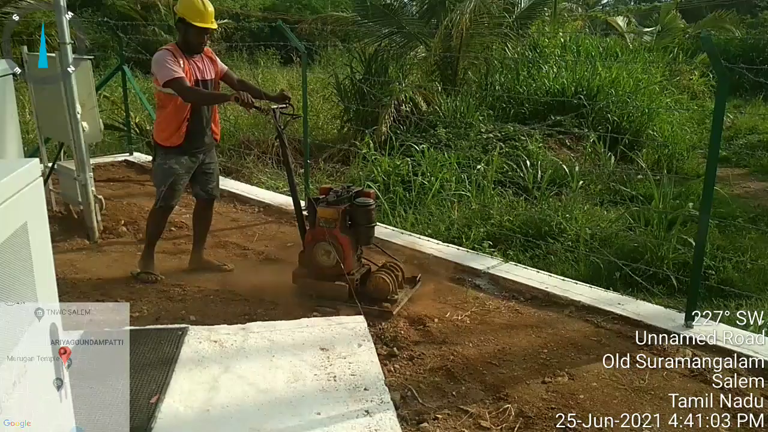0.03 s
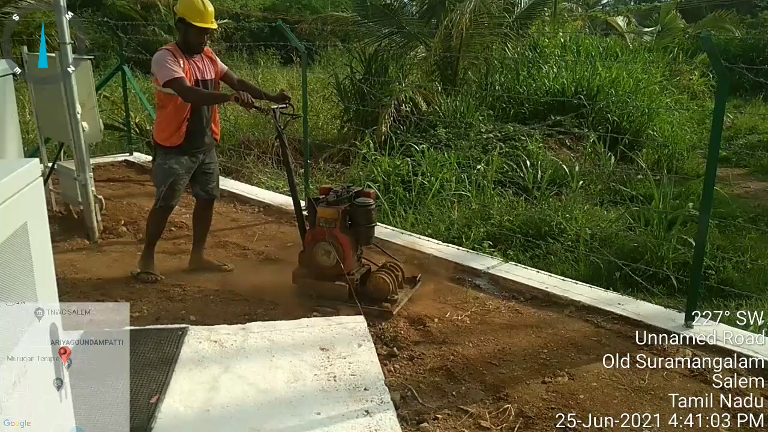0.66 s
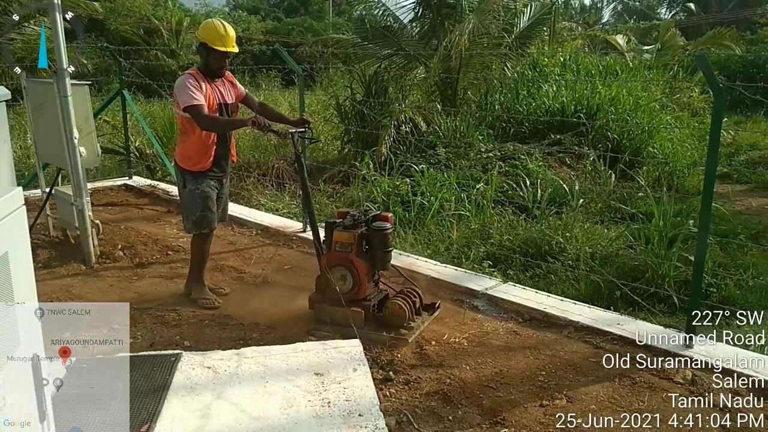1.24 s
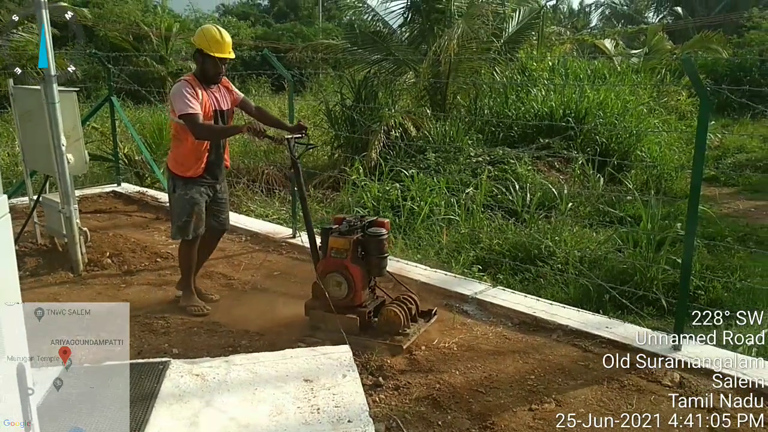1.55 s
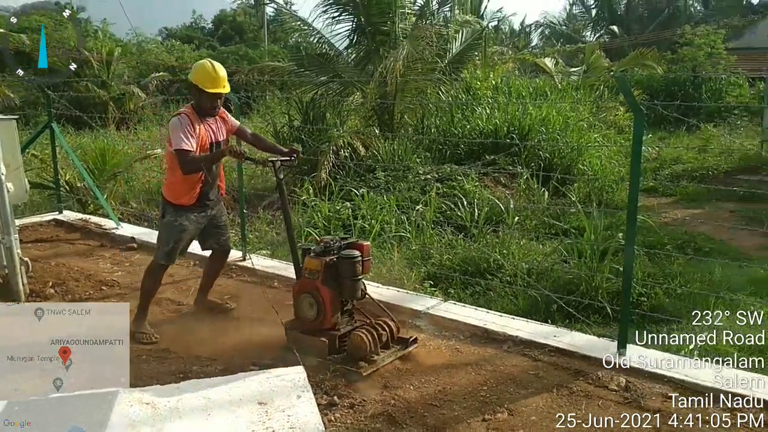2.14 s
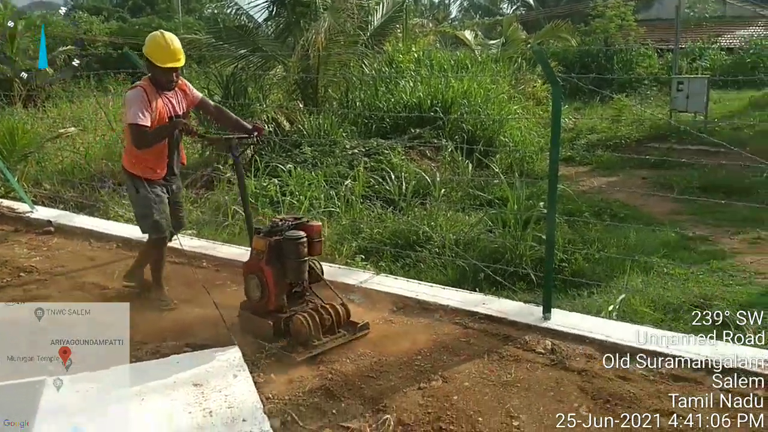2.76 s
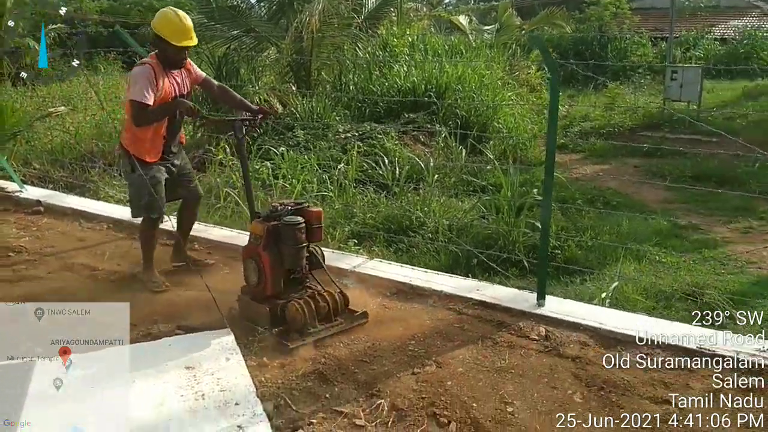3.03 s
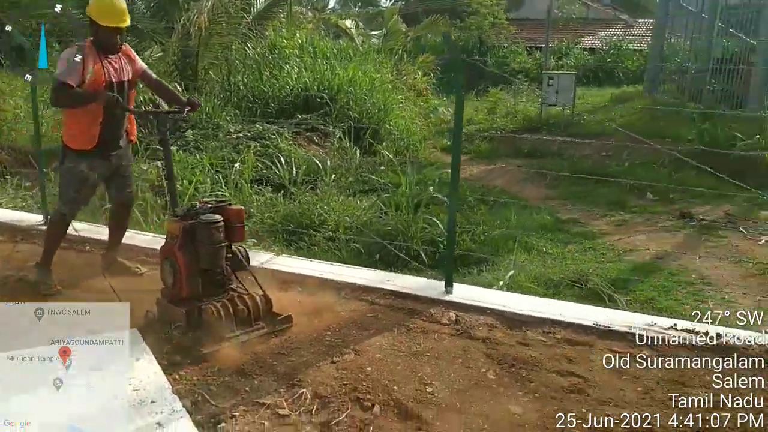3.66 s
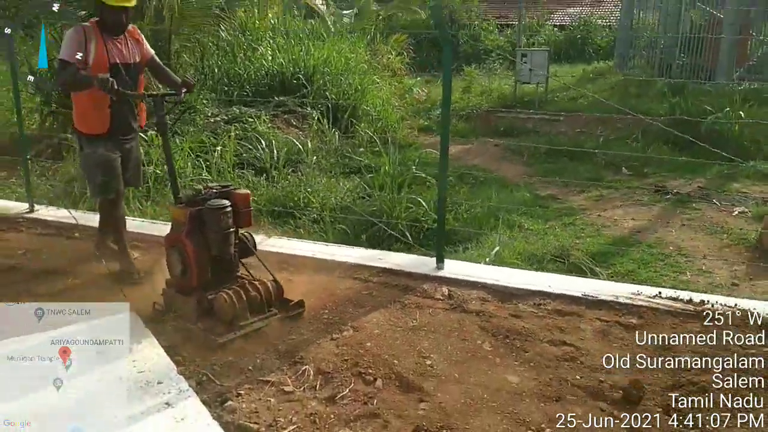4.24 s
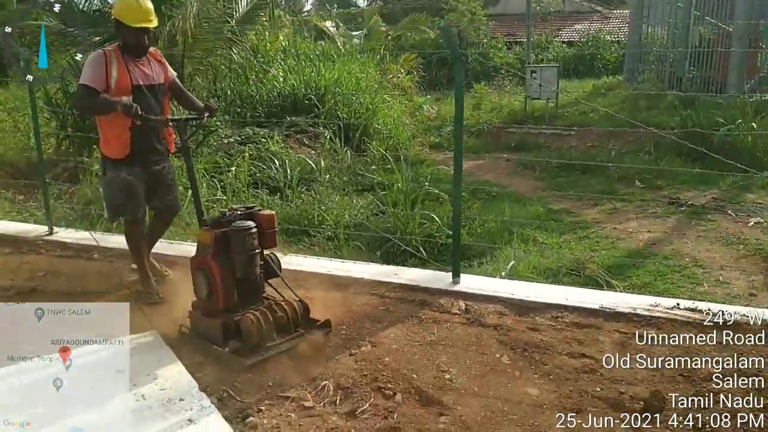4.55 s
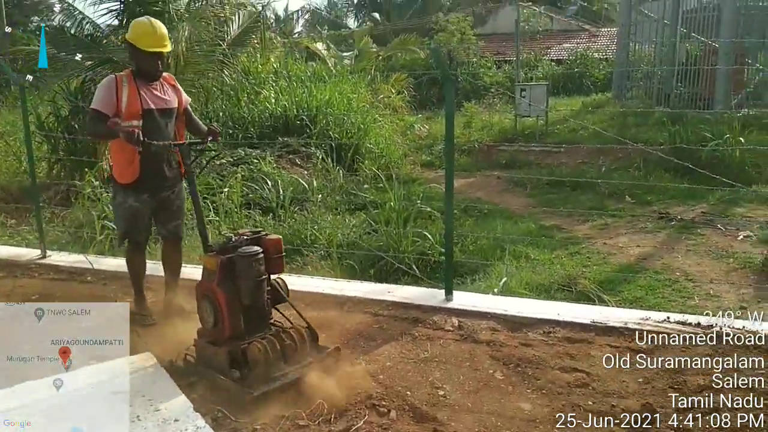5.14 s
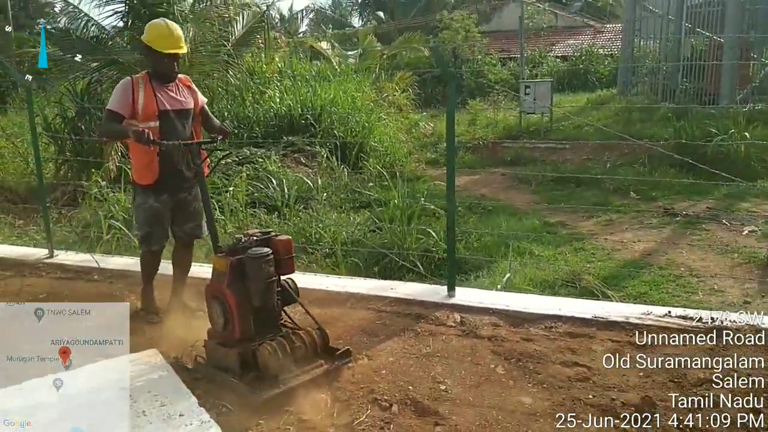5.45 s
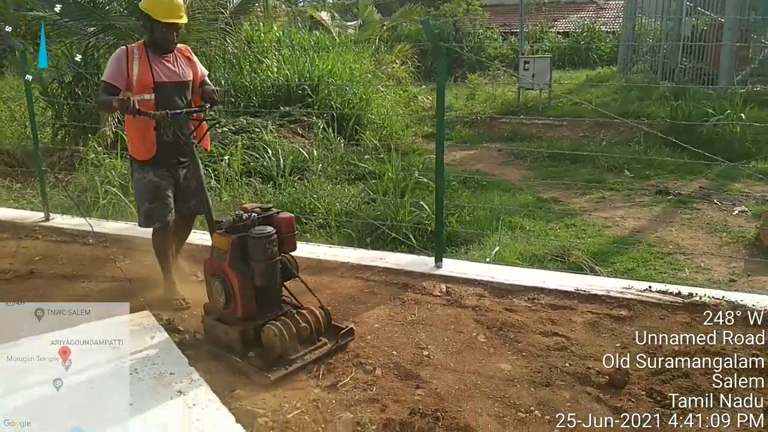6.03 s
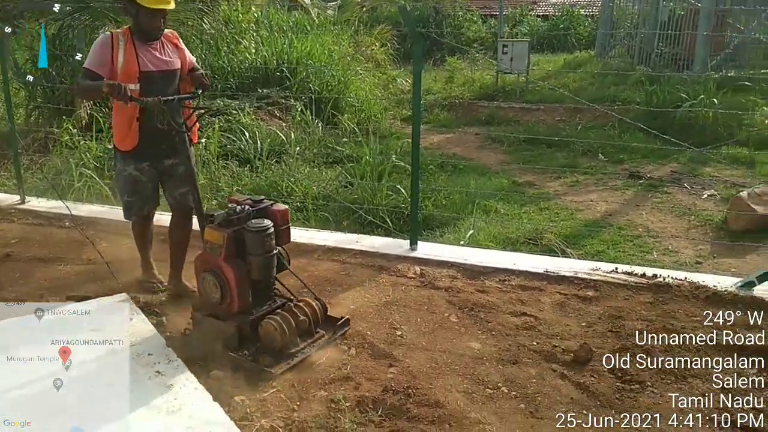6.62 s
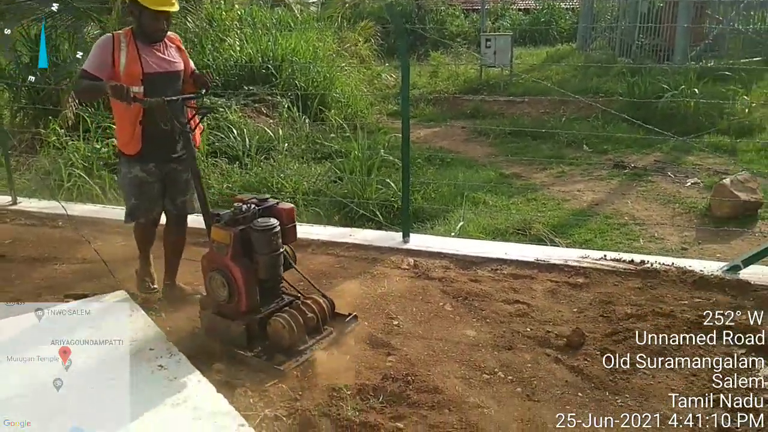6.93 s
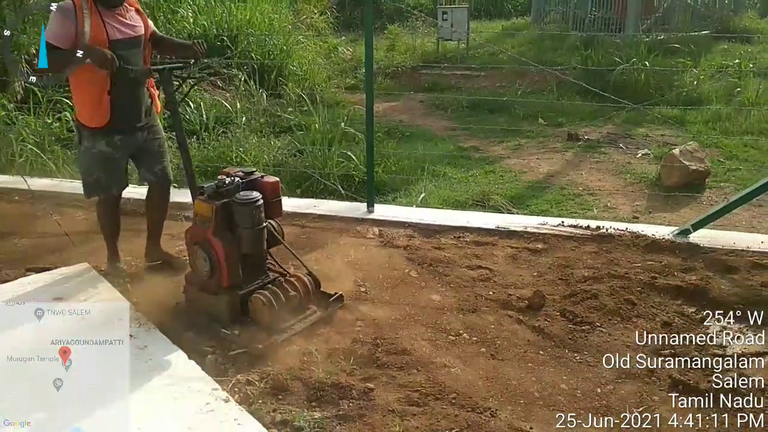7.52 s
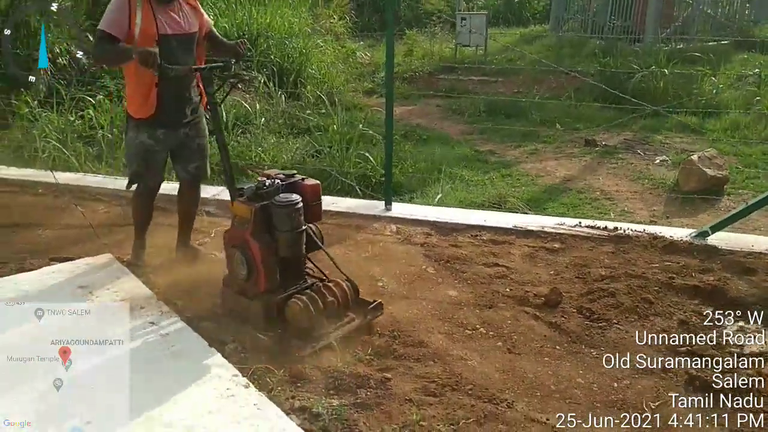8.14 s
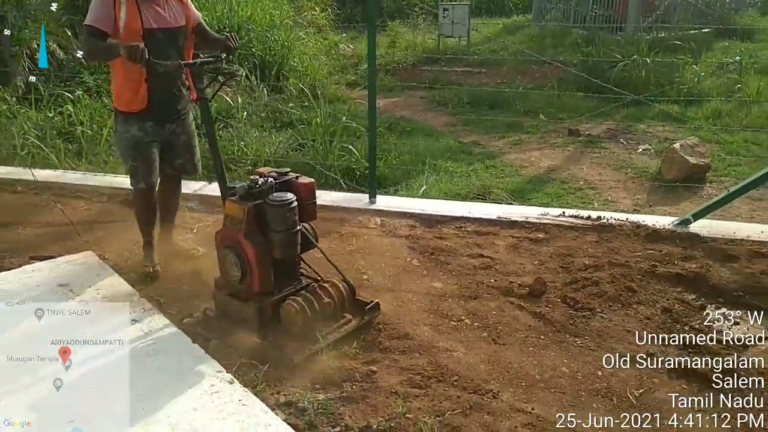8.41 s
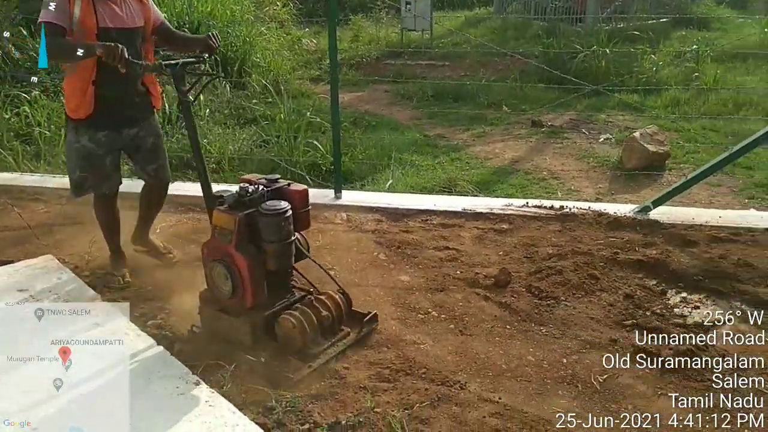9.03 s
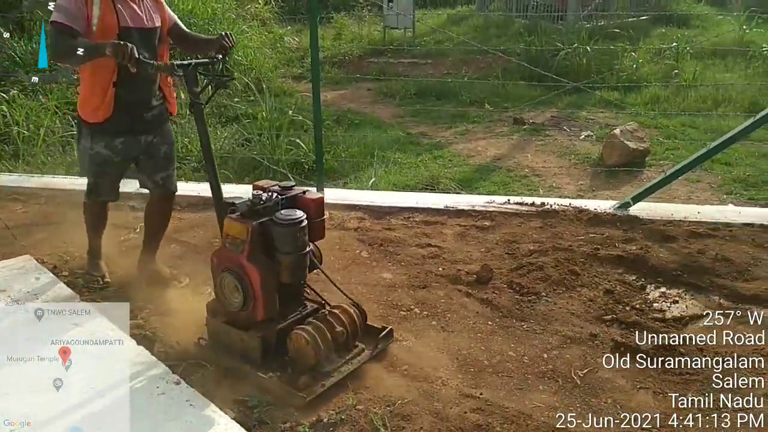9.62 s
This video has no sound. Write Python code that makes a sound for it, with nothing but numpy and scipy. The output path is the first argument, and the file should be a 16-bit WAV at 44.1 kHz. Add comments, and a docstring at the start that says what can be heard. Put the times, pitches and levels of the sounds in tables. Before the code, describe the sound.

A petrol plate compactor runs outdoors with a loud, steady low drone, rapid engine thudding and metallic rattling on bare soil.

```python
"""Plate compactor on bare soil.

A petrol four-stroke single thuds, knocks and ticks, outdoors, a few metres from a hand-held phone.
A belt spins the eccentric at 4/3 crank speed: the plate drones, beats against the engine, rattles
and grinds grit. The machine turns from side-on to head-on, so its panels ring out in turn.
The sound is on for a blip, off for almost a second, then runs on."""
import sys
import numpy as np
from scipy import signal
from scipy.fft import rfft, irfft, next_fast_len
from scipy.io import wavfile
from scipy.ndimage import uniform_filter1d

SR = 44100
rng = np.random.default_rng(int(sys.argv[2]) if len(sys.argv) > 2 else 0)


def generate_wav(signal):
    """Clip the signal to [-1, 1] and save it as 16-bit WAV at the path in sys.argv[1]."""
    frames = np.transpose(np.atleast_2d(signal))
    scaled = np.clip(frames, -1, 1) * 32767
    pcm = np.round(scaled).astype(np.int16)
    wavfile.write(sys.argv[1], SR, pcm)


N = 435266
TIME_S = np.arange(N) / SR
FIRING_HZ = 32.005
EXHAUST_AT_CYCLE, MUFFLER_ORDER = .87, 8  # order: multiple of the firing rate
# guard, tank and plate panel modes: f/Hz, width/Hz, level/dB, beam direction/deg
PANELS = [(400, 60, -7.5, 107), (511, 55, -16.5, 28), (570, 40, -17, 63), (704, 50, -12, 92),
          (1010, 110, -10, 32), (1278, 30, -3, 85), (1637, 40, -4.5, 57), (2180, 350, -8.5, 3)]


def plate(spin, drone_db, octave_db, corner_deg=65, corner_dip_db=-9.5):
    """The eccentric shakes the plate: a low drone of four harmonics."""
    harmonics_db = [
        drone_db + .5 - .3 * wander(25),
        octave_db - .5 + wander(30),
        -27 + muffler_db() + 2 * wander(30),  # rings the muffler
        -28.5 + corner_dip_db * beam(corner_deg) + 2 * wander(23)]  # cancels as a corner faces the phone
    out = 0
    for k, level_db in enumerate(harmonics_db, 1):
        lag_rad = np.pi / 2 if k % 2 == 0 else 0  # even harmonics lag a quarter cycle, softening peaks
        out = out + undb(level_db) * np.cos(2 * np.pi * k * spin - lag_rad)
    return np.sqrt(2) * out


def exhaust(cycle, surge, waver_db=1.8, smear_rad=.021, surge_db=2):
    """One thud per firing; the muffler rings at one order, smears the rest and rocks with the frame."""
    # exhaust and crank lines: order, level/dB
    lines = [(1, -36.5), (2, -21), (3, -30), (4, -32), (5, -29.5), (6, -28.5), (7, -37.5), (8, -26.5),
             (9, -29), (10, -28), (11, -59.5), (12, -34), (13, -52)]
    out = 0
    for k, level_db in lines:
        phase = 2 * np.pi * k * (cycle - EXHAUST_AT_CYCLE) + smear_rad * (k - MUFFLER_ORDER) ** 2
        rocking_db = surge_db * surge * min(k / MUFFLER_ORDER, 1)
        ring_db = muffler_db() if k == MUFFLER_ORDER else 0
        out = out + undb(level_db + ring_db + rocking_db + waver_db * wander(5)) * np.cos(phase)
    return np.sqrt(2) * out


def knock(cycle, at_cycle=.2103, scatter_rad=.64, drift_rad=.38, waver_db=.9, skew_rad=.000076):
    """Combustion rings the block; lines drift as it creeps on, high ones differ in phase at each mic."""
    # block ring lines: order, level/dB
    lines = [(15, -43.5), (16, -42), (17, -50), (18, -38), (19, -33), (20, -37.5), (21, -37.5), (22, -37),
             (23, -33.5), (24, -37), (26, -35), (27, -39), (28, -42), (31, -40), (40, -39.5), (43, -49),
             (49, -37.5), (51, -38.5), (60, -47), (61, -51)]
    out = 0
    for k, level_db in lines:
        phase = 2 * np.pi * k * (cycle - at_cycle) + scatter_rad * rng.standard_normal()
        phase += drift_rad * wander(.95)
        skew = skew_rad * k ** 2 * (1 + wander(.59) / 2) * np.array([[-1], [1]])
        out = out + undb(level_db + panel_lift_db(k) + waver_db * wander(1.3)) * np.cos(phase + skew)
    blow_db = uniform_filter1d(per_cycle(cycle), size=100)
    return np.sqrt(2) * undb(blow_db) * out


def rattle(spin, hardness_db, decay_turns=.31, floor=1.9, scatter_db=2, grain_db=3, split_hz=900):
    """Each landing jolts the loose frame, guard and handle; hard ground rings the panels more."""
    # frame response: f/Hz, level/dB
    frame = [(20, -41), (50, -7), (100, 4), (140, -1), (230, 4.5), (340, -0.5), (440, -5.5), (680, -1),
             (900, -8), (1350, -6), (2000, -12.5), (2400, -20), (3000, -27.5), (6000, -45.5)]
    jolt = floor + np.exp(-(spin % 1) / decay_turns) * undb(scatter_db * per_cycle(spin))
    blows = rng.standard_normal((2, N)) * jolt * undb(grain_db * np.tanh(wander(220)))
    mid, side = colour(blows, frame)
    side = highpass(side, split_hz, order=2) + undb(-4.5) * side  # highs spread wider
    stereo = mid + undb(-1.5) * side * np.array([[1], [-1]])
    return undb(1) * stereo + undb(-3 + .3 * hardness_db) * rings(blows, PANELS)


def clatter(cycle, jitter_cycles=.00033, blow_db=1.05, swell_db=2, views=4):
    """Piston, cam and gears repeat a run of small blows each cycle, heard from a slowly changing angle."""
    # casing response: f/Hz, level/dB
    casing = [(780, -44), (930, -5), (1100, -0.5), (1350, -2), (1480, -4), (1850, -6), (2300, -7.5),
              (2700, -23.5), (4000, -24), (8000, -61)]
    # cover resonances: f/Hz, width/Hz, lift/dB
    covers = [(1217, 90, 5), (1673, 48, 7), (1977, 70, 4)]
    position = (cycle + jitter_cycles * wander(90)) % 1
    places = np.arange(512) / 512
    swell = undb(swell_db * np.cos(4 * np.pi * (places - .21)))
    out = np.zeros((2, N))
    for view in range(views):
        fade = np.clip(1 - np.abs(TIME_S / TIME_S[-1] * (views - 1) - view), 0, 1)
        for channel in range(2):
            blows = rng.standard_normal(len(places)) * swell
            out[channel] += np.sqrt(fade) * np.interp(position, places, blows)
    return undb(-3) * colour(out * undb(blow_db * wander(100)), casing, covers)


def valves(cycle, scatter_db=1.2):
    """Valves open and seat: four bright ticks a cycle ring the valve gear, coloured per mic."""
    # valve events: position/cycle, level/dB, decay/s
    events = [(.06, -1.5, .006), (.36, -3, .0025), (.62, -9, .004), (.845, 0, .004)]
    # tick spectrum, left: f/Hz, level/dB
    tick_left = [(3000, -22), (6300, -14), (8500, -39), (10200, -3.5), (11600, 2.5), (13000, 0.5),
                 (15500, -7)]
    # tick spectrum, right: f/Hz, level/dB
    tick_right = [(3000, -17), (6500, -12.5), (7800, -1.5), (9200, -3.5), (10800, 1), (11800, -12.5),
                  (13000, -24), (15500, -3.5)]
    # valve gear modes: f/Hz, width/Hz, level/dB, beam direction/deg
    gear_modes = [(7900, 760, -2, 54), (10100, 680, -1.5, 3), (10890, 500, 1.5, 90), (11540, 250, 1.5, 56)]
    envelope = 0
    for place, level_db, decay_s in events:
        age_s = (cycle - place) % 1 / FIRING_HZ
        envelope += undb(level_db + scatter_db * per_cycle(cycle - place)) * np.exp(-age_s / decay_s)
    ticks = envelope * rng.standard_normal((2, N))
    left = undb(-4.5) * colour(ticks[0], tick_left)
    right = undb(-.5) * colour(ticks[1], tick_right)
    return np.array([left, right]) + undb(-6.5) * rings(ticks, gear_modes)


def grit(spin, pulse_db=-.9, grain_db=1):
    """Sand ground under the plate and cooling air hiss together."""
    # hiss spectrum: f/Hz, level/dB
    spectrum = [(1500, -18), (2600, 3.5), (3600, 2.5), (5200, 4.5), (6500, 4), (8000, 4.5), (11000, 6.5),
                (13500, 5), (15500, -7)]
    stir = undb(pulse_db * np.cos(2 * np.pi * spin) + grain_db * wander(190))
    return colour(rng.standard_normal((2, N)) * stir, spectrum)


def governor_hz(drone_db, sag_hz_per_db=.04, smooth_s=.5):
    """Firing rate; sags a little as the plate bites harder."""
    load_db = uniform_filter1d(drone_db - drone_db.mean(), int(smooth_s * SR))
    return FIRING_HZ - sag_hz_per_db * load_db


def heading_deg(start_s=1.63, deg_per_s=17.8, last_deg=99.5):
    """Steady turn from side-on (0) to just past head-on."""
    return np.clip(deg_per_s * (TIME_S - start_s), 0, last_deg)


def beam(direction_deg, half_width_deg=16.8):
    """Gain of a radiated beam as the turn sweeps it over the phone."""
    return np.exp(-((heading_deg() - direction_deg) / half_width_deg) ** 2 / 2)


def muffler_db(side_db=-4, front_db=1.5, clear_deg=33):
    """The muffler's ring grows as it swings out from behind the engine."""
    return np.interp(heading_deg(), [0, clear_deg], [side_db, front_db])


def panel_lift_db(order, lift_db=7):
    """An engine line swells when a panel tuned near it faces the phone."""
    return sum(lift_db * beam(direction_deg) for hz, _, _, direction_deg in PANELS
               if abs(order * FIRING_HZ - hz) < FIRING_HZ / 2)


def rings(x, modes, waver_db=1):
    """Resonances driven by x, each beamed its own way and wavering as the machine is steered."""
    out = 0
    for hz, width_hz, level_db, direction_deg in modes:
        ring = unit(signal.lfilter(*signal.iirpeak(hz, hz / width_hz, fs=SR), x))
        out = out + undb(level_db + waver_db * wander(1.5)) * beam(direction_deg) * ring
    return out


def colour(x, spectrum, resonances=()):
    """Pass x through a minimum-phase body, which rings only after a blow; output rms 1."""
    size = next_fast_len(N + 8192, True)
    hz = np.fft.rfftfreq(4096, 1 / SR) + 1
    points_hz, points_db = np.transpose(spectrum)
    db = np.interp(np.log(hz), np.log(points_hz), points_db)
    for centre_hz, width_hz, peak_db in resonances:
        db = db + peak_db / (1 + (2 * (hz - centre_hz) / width_hz) ** 2)
    cepstrum = irfft(np.log(undb(db)))
    half = len(cepstrum) // 2
    causal = np.r_[cepstrum[0], 2 * cepstrum[1:half]]
    response = irfft(np.exp(rfft(causal, 2 * half)))
    return unit(irfft(rfft(x, size) * rfft(response, size), size)[..., :N])


def wander(rate_hz):
    """Random drift, spread near 1."""
    return 1.2 * np.interp(TIME_S * rate_hz, np.arange(2048), rng.standard_normal(2048))


def per_cycle(cycle):
    """One random value held per cycle."""
    return rng.standard_normal(2048)[np.floor(cycle).astype(int)]


def curves(table):
    """Columns interpolated over the first, t/s."""
    times_s, *columns = np.transpose(table)
    return [np.interp(TIME_S, times_s, column) for column in columns]


def highpass(x, hz, order=1):
    """Butterworth high-pass."""
    return signal.sosfilt(signal.butter(order, hz, "high", fs=SR, output="sos"), x)


def undb(db):
    """Decibels to gain."""
    return 10 ** (np.asarray(db) / 20)


def unit(x):
    """Scale to rms 1."""
    return x / np.sqrt(np.mean(x ** 2))


def scene(belt_ratio=4 / 3, creep_hz=.105, in_step_s=5.0):
    """Engine drives plate; belt creep slides the plate's third harmonic past the muffler's order."""
    # plate on soil: t/s, drone level/dB, octave level/dB (grows on hard ground)
    plate_levels = [(1.3, -15, -26), (1.37, -14, -23), (2.36, -16, -16), (3.52, -14, -24),
                    (5.02, -15, -20.5), (6.08, -16, -20.5), (6.41, -18, -13.5), (7.12, -13, -20),
                    (7.53, -14, -15.5), (8.47, -15, -22.5), (9.21, -17, -16), (9.8, -12, -21)]
    # clatter and rattle: t/s, level/dB
    metal_levels = [(1.1, -26.5), (3.6, -28), (6.6, -27), (7.52, -28.5), (8.04, -26), (9.4, -27)]
    drone_db, octave_db = curves(plate_levels)
    metal_db, = curves(metal_levels)
    cycle = np.cumsum(governor_hz(drone_db)) / SR  # engine cycles, two crank turns each
    cycle = cycle - np.interp(in_step_s, TIME_S, cycle) + .41
    # eccentric turns
    spin = belt_ratio * 2 * (cycle - EXHAUST_AT_CYCLE) + creep_hz * (TIME_S - in_step_s) - 1 / 3
    # shaking peaks when crank and eccentric push the same way, about 21 Hz
    surge = np.cos(2 * np.pi * (spin - 2 * cycle + .28))
    drone = exhaust(cycle, surge) + plate(spin, drone_db + surge, octave_db)
    block = undb(.9 * surge) * knock(cycle)
    metal = clatter(cycle) * undb([[-4.5], [3]])  # left, right
    metal += rattle(spin, octave_db - octave_db.mean())
    hiss = valves(cycle) + grit(spin)
    return drone + block + undb(3.5 + metal_db + surge) * metal + undb(-31.5 + .5 * surge) * hiss


def record(dry, ceiling=.87, thin_hz=135, bass_in_s=1.21, top_hz=15650):
    """Left mic slightly late, bass thin at first, peaks rounded, sound gated, top cut."""
    # sound on: start/s, end/s
    on_spans = [(.047, .0595), (.937, 10)]
    sound = np.array([np.roll(dry[0], 3), dry[1]])
    bass_fade = np.clip((TIME_S - bass_in_s) / .02, 0, 1)
    sound = bass_fade * sound + (1 - bass_fade) * highpass(sound, thin_hz)
    sound = ceiling * np.tanh(undb(.78) * sound / ceiling)
    sound = highpass(sound, hz=8)
    gate = sum((TIME_S >= start_s) & (TIME_S < end_s) for start_s, end_s in on_spans)
    return signal.sosfilt(signal.ellip(10, .1, 90, top_hz, fs=SR, output="sos"), sound * gate)


dry = scene()
out = record(dry)
generate_wav(out)
```